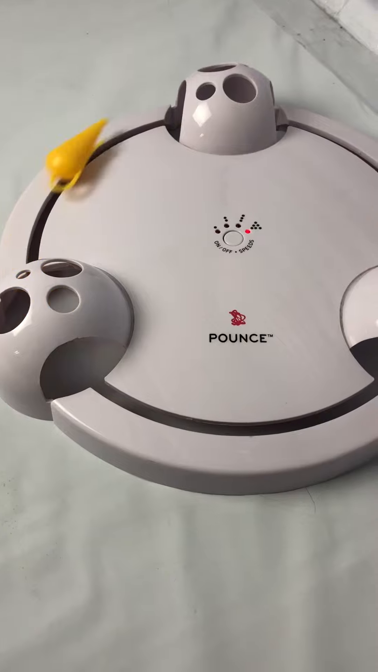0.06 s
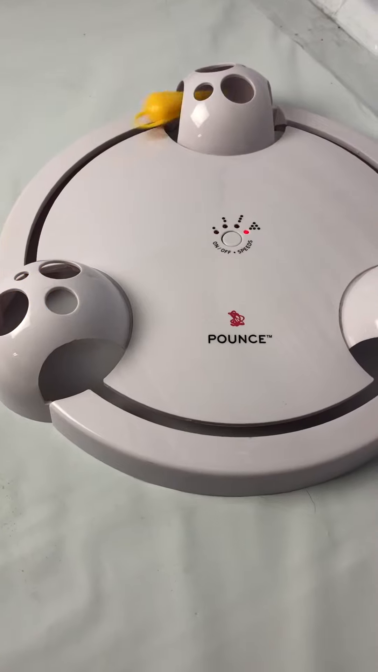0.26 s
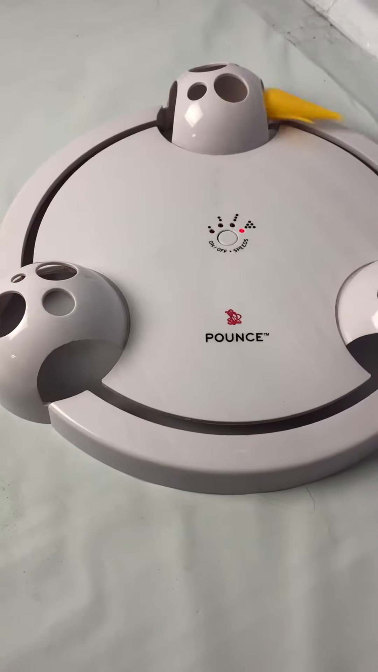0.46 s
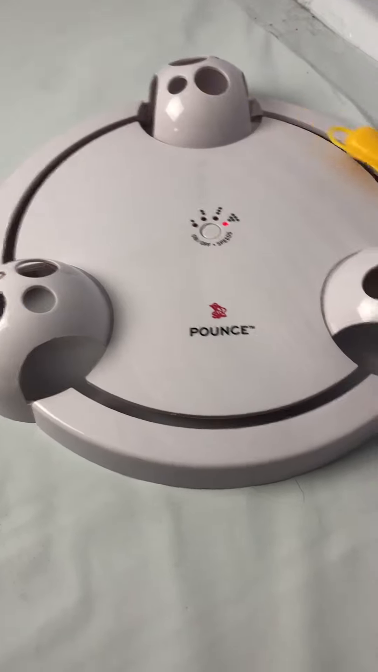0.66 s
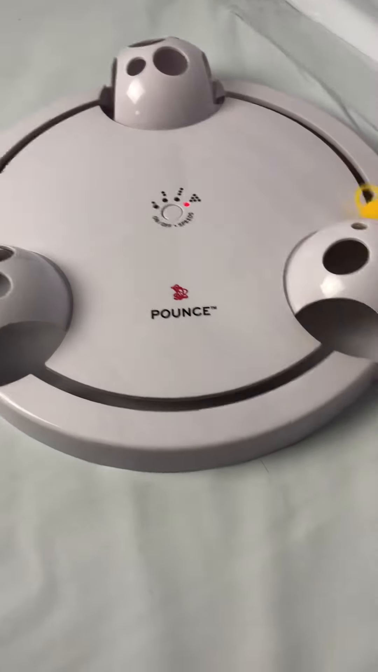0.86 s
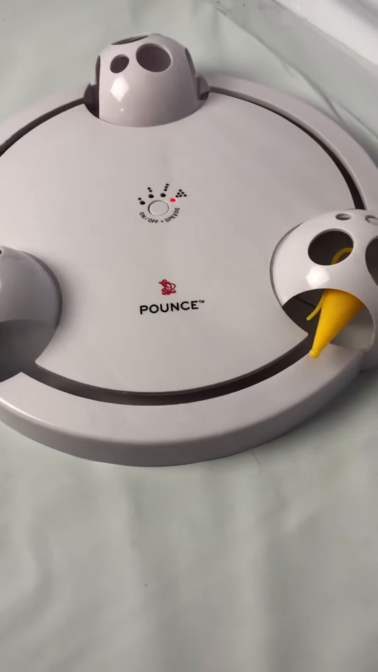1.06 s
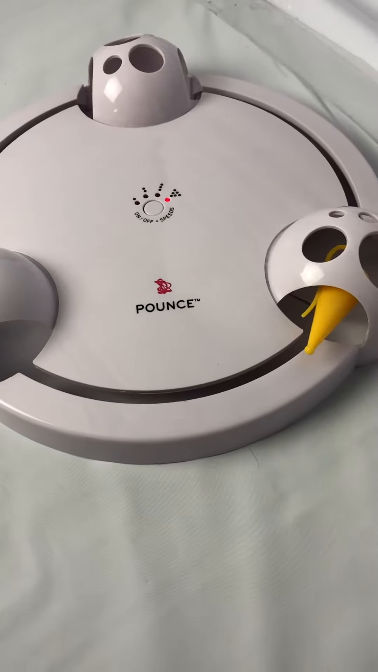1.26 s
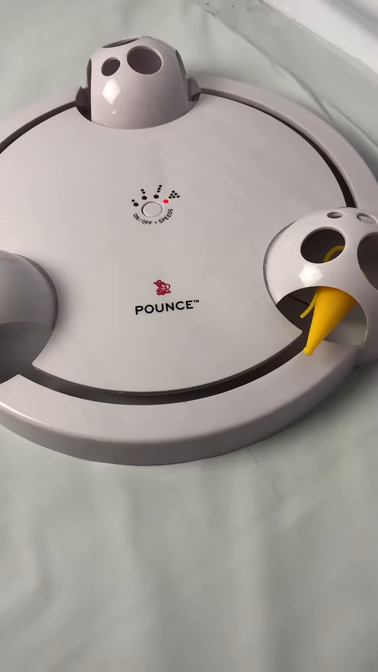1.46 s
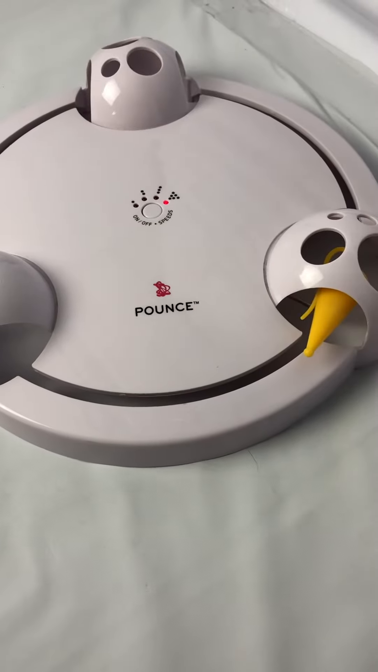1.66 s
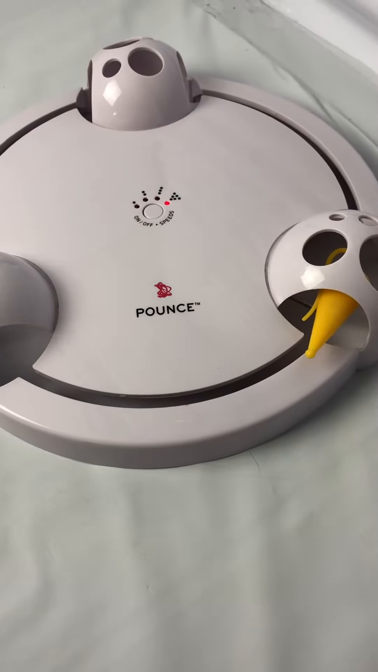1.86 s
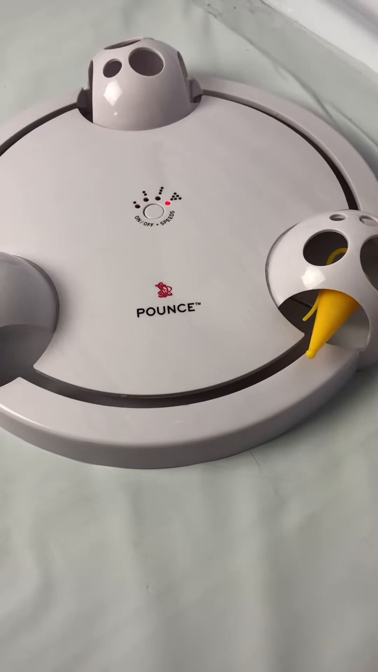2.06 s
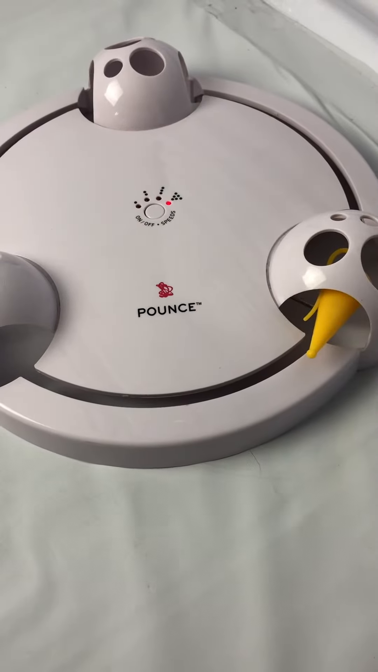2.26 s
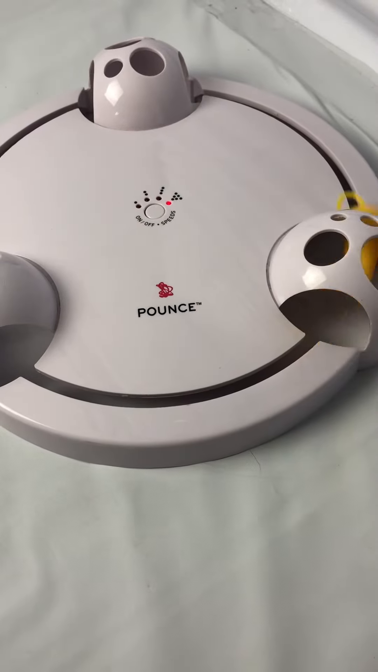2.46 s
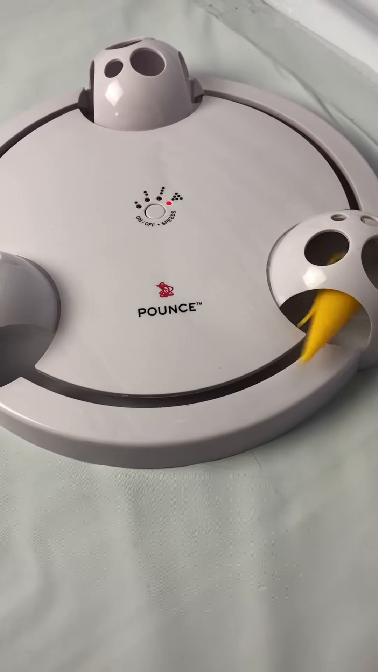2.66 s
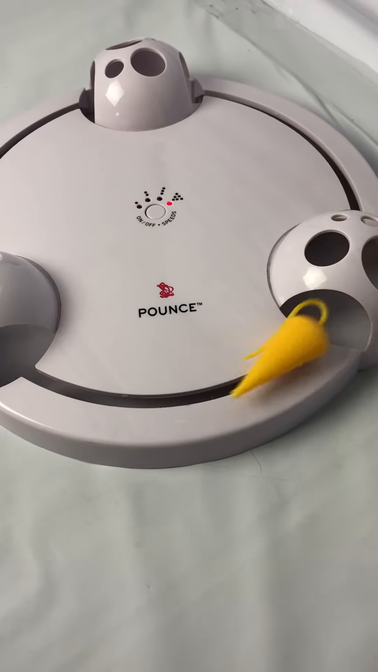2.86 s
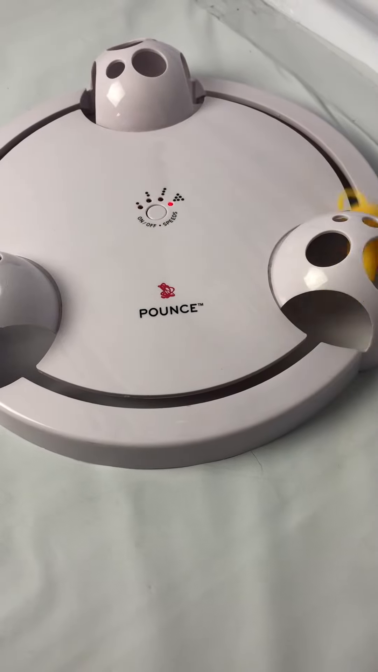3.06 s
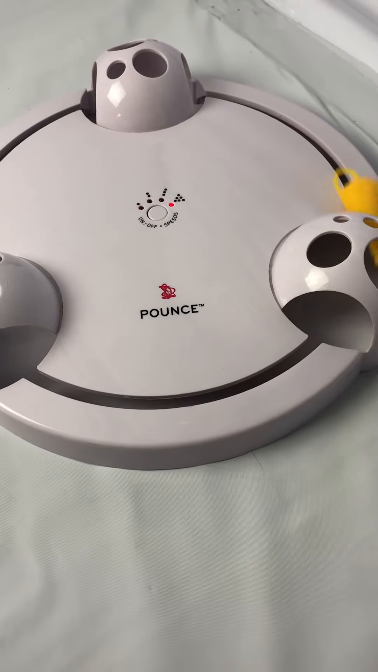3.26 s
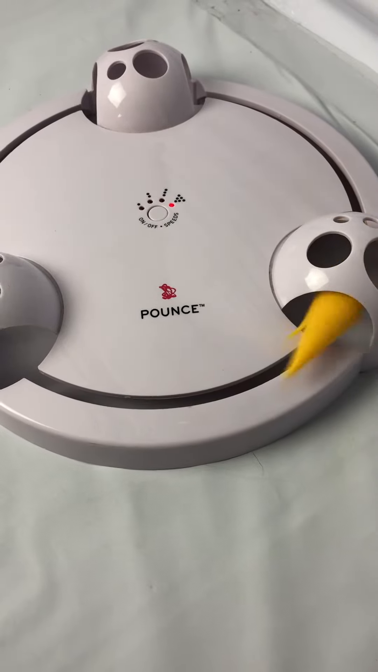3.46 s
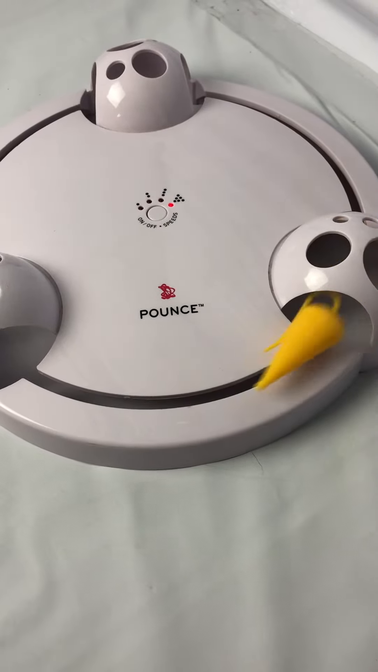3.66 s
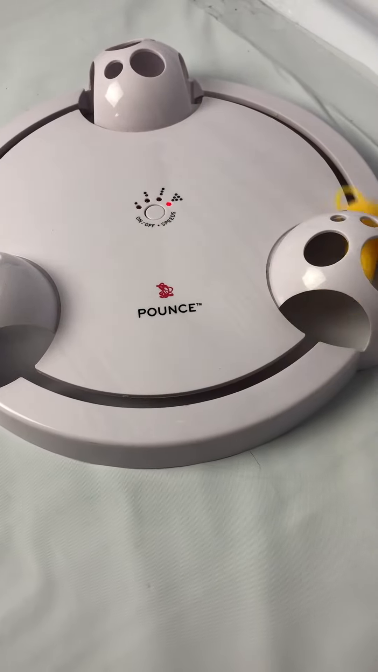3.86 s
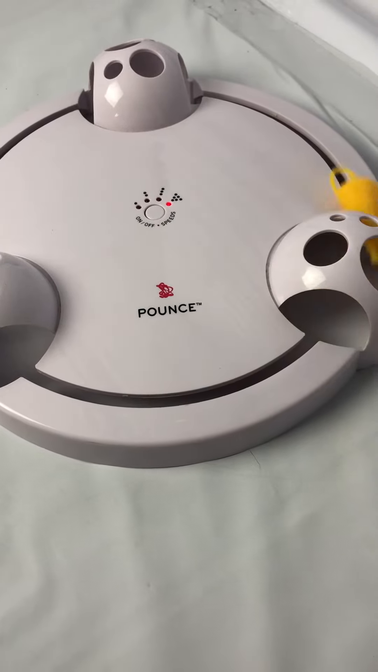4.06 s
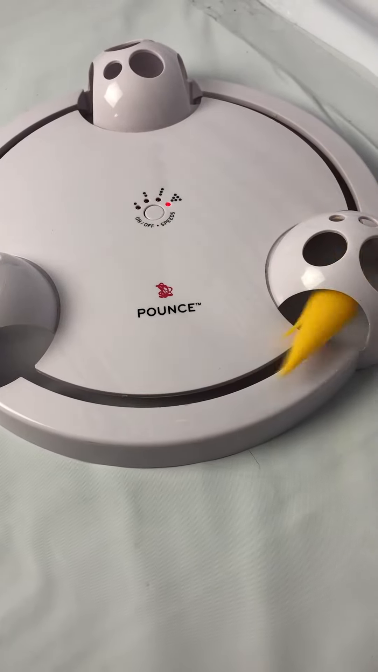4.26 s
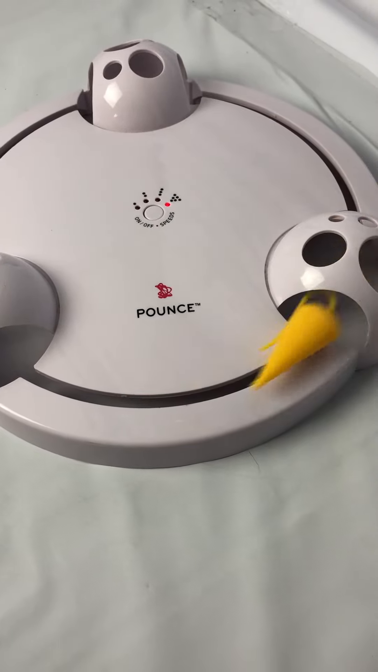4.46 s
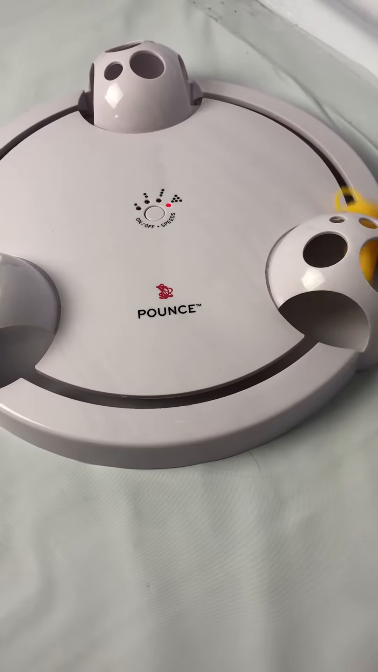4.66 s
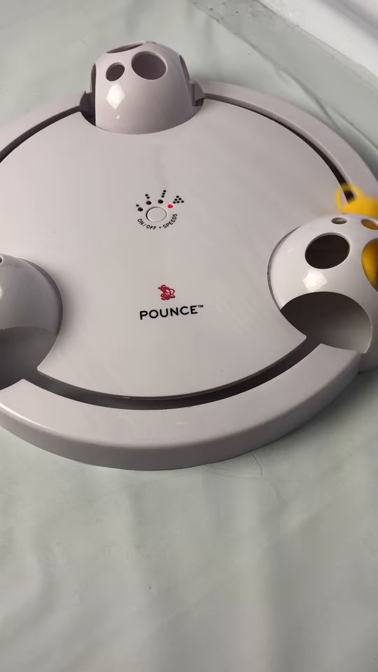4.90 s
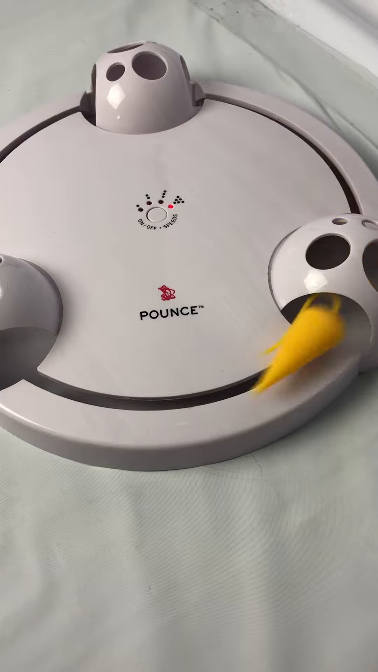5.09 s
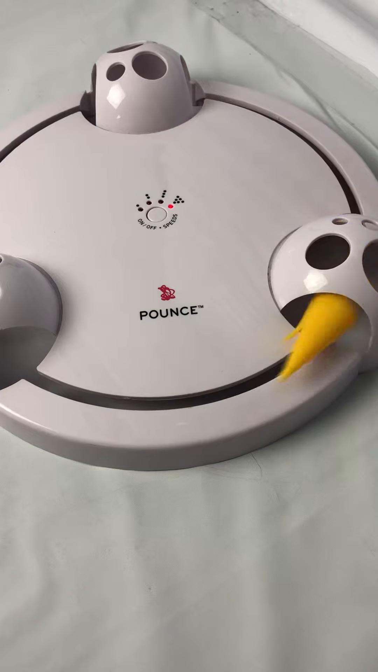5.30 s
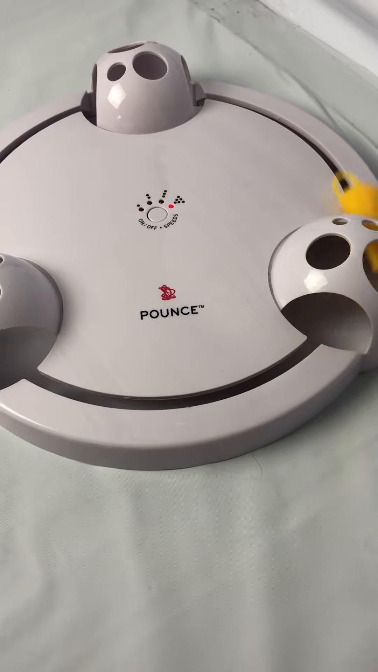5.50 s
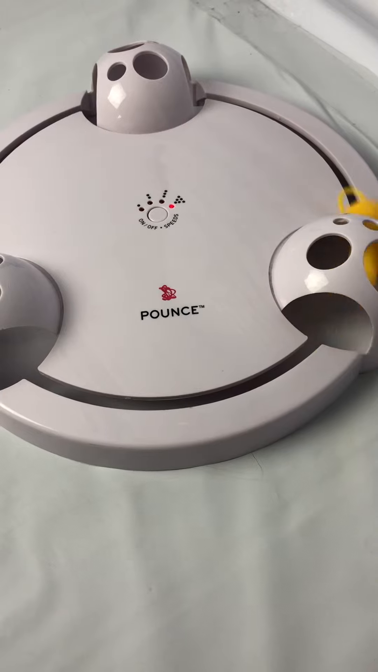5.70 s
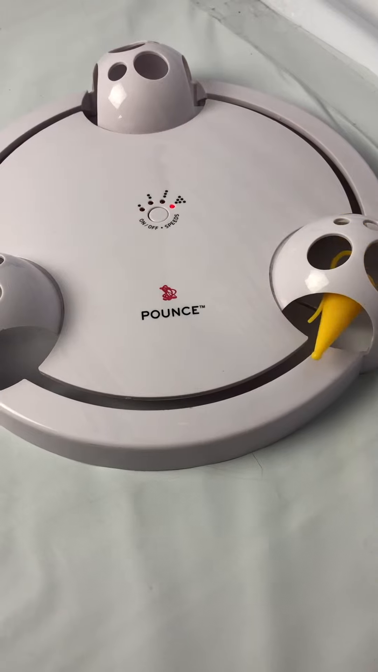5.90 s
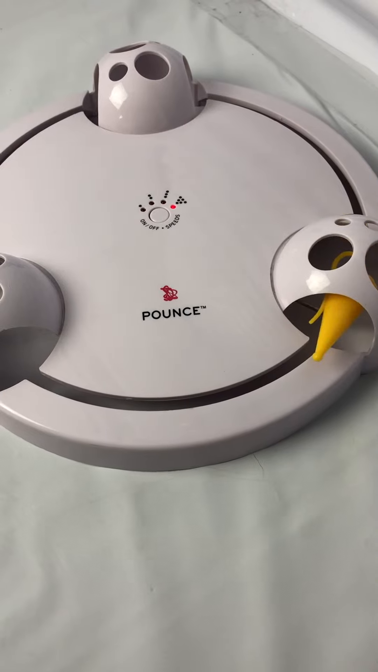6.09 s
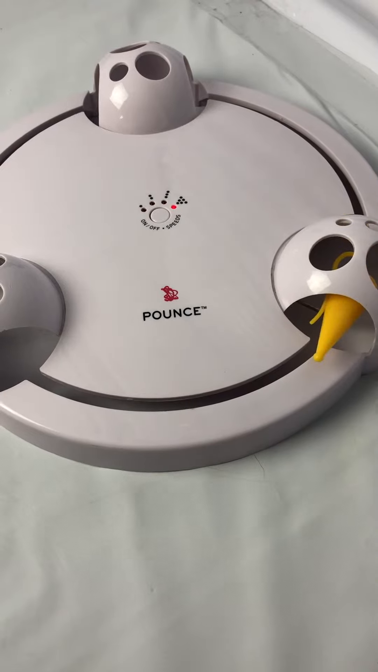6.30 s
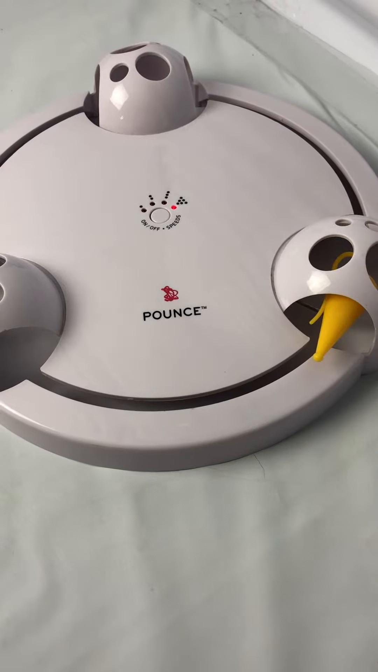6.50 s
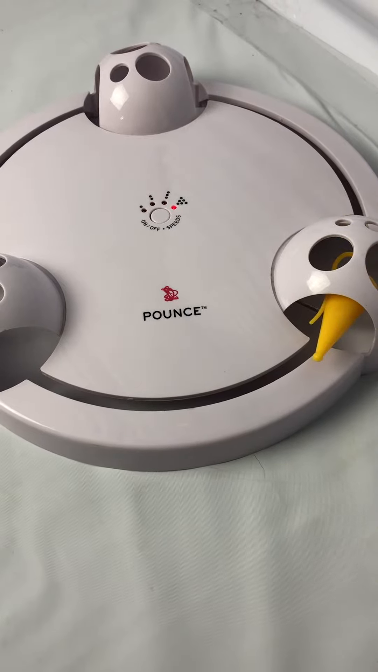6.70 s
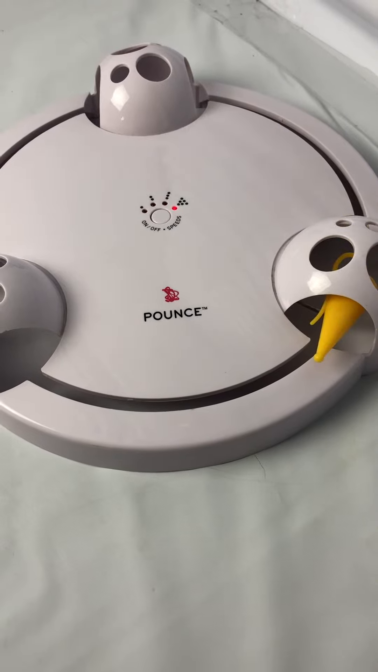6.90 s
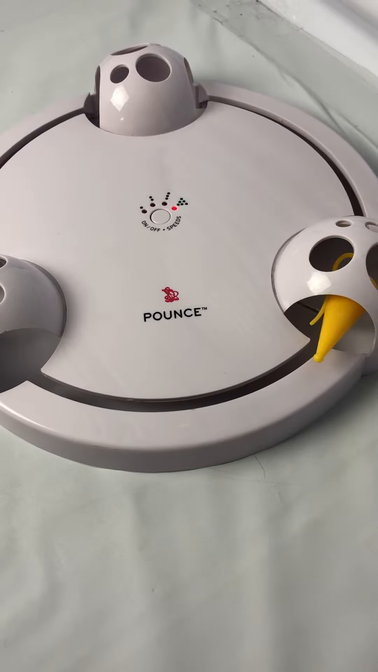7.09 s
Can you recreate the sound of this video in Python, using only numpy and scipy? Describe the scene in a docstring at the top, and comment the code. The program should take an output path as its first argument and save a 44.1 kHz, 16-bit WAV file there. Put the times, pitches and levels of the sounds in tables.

```python
"""A quiet room, with a battery cat toy on a cloth: a small geared motor swings a wand under a plastic shell.
It makes one long sweep, rests, starts with a jolt and jerks to and fro. Gears whirr, loose wheels rattle,
brushes hiss, and the wand knocks and drags in its slot. At each reversal a small part ticks and the slack
in the gear train slams shut, shaking the shell. A soft rumble and mains hum lie underneath."""
import sys
import numpy as np
from scipy import signal
from scipy.fft import rfft, irfft
from scipy.io import wavfile
from scipy.ndimage import uniform_filter1d

SR = 44100
rng = np.random.default_rng(int(sys.argv[2]) if len(sys.argv) > 2 else 0)


def materialize(psi):
    """Save the field psi as 16-bit PCM at rate SR to the path in sys.argv[1].

    A 1-D psi becomes a single channel; in a 2-D psi each row is a channel.
    """
    bounded = np.clip(np.atleast_2d(psi).T, -1, 1)
    quanta = np.round(bounded * 32767).astype(np.int16)
    wavfile.write(sys.argv[1], SR, quanta)


N = 314918
TIME = np.arange(N) / SR

# When the motor has power. Each row: on in seconds, off in seconds.
MOTOR_RUNS = [(-0.2, 1.1), (2.368, 5.945)]
# The motor turns round, out and back in turn. Each row: slam time in seconds, body in dB, crack in dB,
# bounce in dB against the slam, rebound delay in seconds, rebound in dB against the slam, tick in dB.
REVERSALS = [(1.065, -33, -38, -3, .022, -2, -42), (2.491, -32.5, -40.5, -6.5, .024, -2, -58),
             (2.71, -28, -35.5, -4.5, .027, -3.5, -45.5), (3.096, -30.5, -40.5, -5.5, .025, -7, -53),
             (3.49, -31.5, -38.5, -12, .03, 2.5, -42), (3.889, -30.5, -35.5, -6.5, .022, -5.5, -51),
             (4.29, -33, -39, -6, .028, 2, -44.5), (4.691, -30, -38, -7, .022, -6, -53.5),
             (5.088, -29, -37.5, -7, .024, -8.5, -46), (5.488, -30, -38, -6.5, .023, -4.5, -54),
             (5.884, -34.5, -40, .5, .023, 0.3, -42.5)]
# Load on the gears through each move. Each row: seconds into the move, whirr in dB, rattle in dB.
SWEEP_LOAD = [(0, -45.5, -53), (.2, -46.5, -60.5), (.38, -44, -51), (.5, -40.5, -46), (.6, -46.5, -58),
              (.8, -45.5, -58), (.98, -47, -60), (1.06, -42.5, -48.5)]  # heaviest as the wand scrapes through a hood
SWING_OUT_LOAD = [(0, -40.5, -46), (.04, -44, -50), (.1, -47.5, -56), (.155, -41, -50), (.22, -53, -57.5),
                  (.29, -49.5, -54.5), (.34, -51, -54.5), (.39, -47.5, -48)]
SWING_BACK_LOAD = [(0, -48, -44), (.05, -48.5, -50.5), (.11, -48.5, -52.5), (.16, -49, -53), (.2, -45, -52),
                   (.25, -46.5, -51.5), (.33, -47, -55), (.39, -47, -48.5)]

# The wand hits its slot and the hoods. Each row: start in seconds, body in dB, crack in dB.
WAND_KNOCKS = [(0.014, -41.5, -56.5), (0.277, -40, -54), (0.366, -38.5, -53), (0.415, -56, -47.5),
               (0.432, -48, -52), (0.466, -33, -51), (0.477, -50, -40.5), (0.49, -37, -46),
               (0.523, -39.5, -43.5), (2.595, -48, -45), (2.837, -36, -41), (2.853, -44.5, -44.5),
               (3.23, -42.5, -51), (3.302, -44.5, -47), (3.508, -35.5, -39.5), (3.636, -37, -38),
               (3.964, -41, -49.5), (4.008, -40, -52.5), (4.067, -41.5, -47), (4.309, -34, -39.5),
               (4.432, -39.5, -40.5), (4.477, -45, -66), (4.504, -40.5, -52.5), (4.867, -41, -42.5),
               (5.129, -44, -43.5), (5.234, -39.5, -41), (5.628, -41, -49.5), (5.663, -41, -47),
               (5.688, -44, -54), (5.766, -43.5, -56.5), (5.954, -45, -52)]
# The gears rock back softly once the motor stops. Each row: start in seconds, body in dB.
GEAR_BUMPS = [(1.135, -46), (1.188, -56.5), (6.008, -58.5), (6.049, -64.5)]
# The motor kicks the base as it restarts. Each row: start in seconds, level in dB.
MOTOR_JOLT = [(2.386, -46)]

# Resonances of the toy's parts. Each row: centre in Hz, width in Hz, boost or cut in dB.
SHELL_MODES = [(156, 31, 8.5), (228.6, 34, 5.5), (290.1, 47, 9.5), (526.7, 56, 7.5), (639, 37, 4),
               (700.3, 22, 10.5), (893, 13, 4), (959, 34, 6.5), (1023, 102, 9.5), (1203, 86, 4),
               (1477, 15, 5.5), (1514, 51, 5), (1689, 128, 5), (2258, 180, 7.5), (2828, 210, 6.5),
               (3203, 59, 8), (3530, 70, 2), (4005, 49, -14.5), (4014, 150, 10), (4820, 240, 5.5),
               (5300, 110, 5.5), (5960, 140, 4.5)]
MOTOR_CAN_MODES = [(6380, 170, 11), (6740, 120, 11), (6840, 150, 1.5), (7500, 120, 6), (8290, 210, 3.5),
                   (10350, 251, 10.5), (11500, 185, 6), (12500, 380, 7)]
TICK_MODES = [(3240, 207, -4.5), (3444, 194, -1.5), (3900, 280, -4), (4650, 250, -7), (5130, 200, -7),
              (5730, 330, -13), (7400, 900, -20), (8580, 400, -20), (12000, 9200, -30)]
JOLT_MODES = [(640, 75, -4), (665, 110, -6), (1010, 210, -9)]

# The broad tone colour of each layer. Each row: frequency in Hz, relative level in dB.
WHIRR_COLOUR = [(25, -34.5), (60, -4.5), (130, -8), (280, -13.5), (420, -18), (560, -9.5), (680, 0),
                (1000, -4), (1550, -6), (2000, -16.5), (3000, -28), (5000, -52), (9000, -41.5),
                (16000, -53)]
RATTLE_COLOUR = [(100, -8), (450, 0.5), (700, 0), (1100, 5.5), (1600, 12), (2300, -1), (3500, 4),
                 (5200, -5.5), (7500, -18), (10000, -30), (16000, -26)]
BRUSH_COLOUR = [(1000, -29), (2500, 2), (4000, -7), (5600, 1.5), (7000, -2.5), (8300, -1), (9200, -14.5),
                (12000, -13), (16000, -17)]
AMBIENCE_COLOUR = [(15, -65), (25, -35), (48, -6.5), (91, -15), (101, -7.5), (122, 0.5), (148, -15),
                   (183, -9), (582, -19.5), (648, -21), (1530, -27), (1850, -28.5), (3000, -31.5),
                   (8580, -35), (15500, -40)]
BODY_COLOUR = [(30, -41.5), (130, -8), (300, -20), (420, -22.5), (680, -3.5), (1000, -4.5), (1300, 1),
               (1700, -6), (2200, -15), (3500, -18), (16000, -62)]
CRACK_COLOUR = [(500, -42), (1500, -1.5), (2400, -5.5), (3500, -1.5), (5200, -0.5), (7500, -3),
                (9000, -9.5), (11000, -15), (16000, -19.5)]
BOOM_COLOUR = [(25, -27.5), (55, 0.5), (100, -9.5), (150, -3.5), (280, -7), (400, -19), (800, -32),
               (4000, -90)]
DRAG_COLOUR = [(300, -15.5), (700, -4), (1000, -3.5), (1300, -4), (1600, 1.5), (2050, -3.5), (2500, -18.5),
               (4000, -19.5), (9000, -29), (16000, -46)]

# The room's short tail. Each row: frequency in Hz, seconds to fall by 60 dB.
ROOM_T60 = [(100, 0.7), (300, 0.34), (800, 0.19), (2000, 0.17), (6000, 0.15), (15000, 0.13)]


def from_db(db):
    """Decibels as a gain."""
    return 10 ** (np.asarray(db) / 20)


def rms_one(x):
    """Bring a signal to an rms of 1."""
    return x / np.sqrt(np.mean(x ** 2) + 1e-20)


def at_hz(points, hz):
    """Read a table on a log-frequency axis."""
    f, value = np.transpose(points)
    return np.interp(np.log(hz + 0.00094), np.log(f), value)


def response(colour, modes, size):
    """Minimum-phase response of a broad colour with resonances, so nothing rings ahead of a hit."""
    hz = np.arange(size // 2 + 1) * SR / size
    db = at_hz(colour, hz)
    for centre, width, lift in modes:
        db = db + lift / (1 + (2 * (hz - centre) / width) ** 2)
    cepstrum = irfft(np.log(from_db(db)), size)
    cepstrum[1:size // 2] *= 2
    cepstrum[size // 2 + 1:] = 0
    return np.exp(rfft(cepstrum))


def coloured(x, colour, modes=(), size=16384):
    """Play x through a colour and its resonances; it comes out at rms 1."""
    return rms_one(signal.oaconvolve(x, irfft(response(colour, modes, size)))[:N])


def resonate(x, hz, width):
    """Two-pole resonance with a gain of 1 at its peak."""
    r = np.exp(-np.pi * width / SR)
    feedback = [1, -2 * r * np.cos(2 * np.pi * hz / SR), r * r]
    return signal.lfilter(np.array([1, 0, -1]) * (1 - r * r) / 2, feedback, x)


def motor_speed(spin_up_s=0.073, coast_s=0.017):
    """From 0 to 1: the motor spins up under power and coasts to rest when cut."""
    return sum((1 - np.exp(-np.maximum(TIME - on, 0) / spin_up_s))
               * np.exp(-np.maximum(TIME - off, 0) / coast_s) for on, off in MOTOR_RUNS)


def gear_load():
    """Gains of whirr and rattle: the long sweep, then a fresh swing from each reversal."""
    db = np.zeros((2, N))
    swings = [(row[0], SWING_BACK_LOAD if k % 2 else SWING_OUT_LOAD) for k, row in enumerate(REVERSALS)]
    for start, course in [(0, SWEEP_LOAD)] + swings:
        s, *columns = np.transpose(course)
        after = TIME >= start
        db[:, after] = [np.interp(TIME[after] - start, s, column) for column in columns]
    return from_db(db) * motor_speed()


def contacts(rate_hz, jitter, uneven_db):
    """A train of clicks, loose in timing, each with its own force."""
    spacing, force = rng.standard_normal((int(8 * rate_hz), 2)).T
    at = (np.cumsum(1 + jitter * spacing) * SR / rate_hz).astype(int)
    inside = (at >= 0) & (at < N)
    clicks = np.zeros(N)
    clicks[at[inside]] = from_db(uneven_db * np.clip(force[inside], -2, 2))
    return rms_one(clicks - clicks.mean())


def gears(drive):
    """The teeth of a slow and a fast stage tap through the shell, over the rub of their flanks."""
    slow = from_db(-6.0) * contacts(rate_hz=146, jitter=.05, uneven_db=2.0)
    fast = from_db(-6.5) * contacts(rate_hz=340, jitter=.12, uneven_db=4.0)
    rub = from_db(3) * rng.standard_normal(N)
    return drive * coloured(slow + fast + rub, WHIRR_COLOUR, SHELL_MODES)


def rattle(drive, decay_s=0.0052):
    """Loose wheels flop over, each time with a short gritty scrape."""
    flops = contacts(rate_hz=40, jitter=0.33, uneven_db=2.5)
    scrapes = signal.lfilter([1], [1, -np.exp(-1 / (decay_s * SR))], flops - flops.min())
    grit = (rms_one(scrapes) + 0.82) * rng.standard_normal(N)
    return drive * coloured(grit, RATTLE_COLOUR, SHELL_MODES)


def brushes(level_db=-63.5, dip_db=-0.5, lead_s=0.12, width_s=0.052):
    """The brushes scrape and ring the motor can, easing a touch as it slows for each reversal."""
    stall = sum(np.exp(-((TIME - s + lead_s) / width_s) ** 2) for s, *_ in REVERSALS)
    hiss = coloured(rng.standard_normal(N), BRUSH_COLOUR, MOTOR_CAN_MODES)
    return from_db(level_db + dip_db * stall) * motor_speed() * hiss


def ambience(hum_hz=110):
    """The room's bed: mains hum, a faint high tone, soft rumble and hiss."""
    hum = from_db(-76.5) * rms_one(np.sin(2 * np.pi * hum_hz * TIME))
    tone = from_db(-89) * rms_one(resonate(rng.standard_normal(N), hz=8620, width=170))
    rumble = from_db(-68) * coloured(rng.standard_normal(N), AMBIENCE_COLOUR)
    return hum + tone + rumble


def chatter(count, decay_s, grit_db, rise_s, size=8192):
    """One fast-dying burst of tiny uneven contacts per blow; rise and decay may differ by blow."""
    t = np.arange(size) / SR
    draws = rng.standard_normal((count, 2, size))
    grit = draws[:, 0] * from_db(grit_db * np.clip(draws[:, 1], -2, 2))
    return grit * np.exp(-t / decay_s) * (1 - np.exp(-t / rise_s))


def place(times, dbs, bursts):
    """Lay bursts on the timeline, each levelled by its first 8 ms."""
    track = np.zeros(N + bursts.shape[1])
    head = int(.008 * SR)
    for s, db, burst in zip(times, dbs, bursts):
        at = max(int(s * SR), 0)
        track[at:at + len(burst)] += from_db(db) * burst / np.sqrt(np.mean(burst[:head] ** 2))
    return track[:N]


def knocks(blows, firm_db=-35.5, span_db=4.5, size=8192):
    """Each blow is a hard crack, a clack of the shell's body and a slower boom of the hollow base."""
    s, body_db, crack_db = np.transpose(blows)
    # 0 is a firm, abrupt slap; 1 is a graze that builds more slowly and scrapes on for longer
    graze = np.clip((firm_db - crack_db) / span_db, 0, 1)[:, None]
    body = chatter(len(s), decay_s=0.0045 + 0.0039 * graze, grit_db=2.5, rise_s=0.001 + 0.0015 * graze)
    crack = chatter(len(s), decay_s=0.0051 + 0.0022 * graze, grit_db=5, rise_s=0.0005 + 0.00065 * graze)
    body = irfft(rfft(body) * response(BODY_COLOUR, SHELL_MODES, size))
    crack = irfft(rfft(crack) * response(CRACK_COLOUR, SHELL_MODES, size))
    bloom = np.exp(-TIME[:size] / 0.032) * (1 - np.exp(-TIME[:size] / 0.0062))
    swell = place(s, body_db, np.tile(bloom, (len(s), 1)))
    boom = from_db(-28.5) * swell * coloured(rng.standard_normal(N), BOOM_COLOUR, SHELL_MODES)
    return place(s, body_db, body) + place(s, crack_db, crack) + boom


def knocks_and_bumps(bump_crack_db=-74):
    """Cues for the wand's knocks, then the soft bumps of the gears rocking back, with hardly any crack."""
    return list(WAND_KNOCKS) + [(s, body_db, bump_crack_db) for s, body_db in GEAR_BUMPS]


def ringing(blows, modes, decay_s):
    """Short touches ring a few modes; each resonance acts twice, so little lies between them."""
    s, db = np.transpose(blows)
    touch = chatter(len(s), decay_s=decay_s, grit_db=1.5, rise_s=0.00018)
    ring = sum(from_db(gain) * resonate(resonate(touch, hz, width), hz, width)
               for hz, width, gain in modes)
    return place(s, db, ring)


def ticks(lead_s=.0495):
    """A small stiff part snaps over and rings high ahead of each reversal, firmer before a swing out."""
    return ringing([(s - lead_s, tick_db) for s, *_, tick_db in REVERSALS], TICK_MODES, decay_s=0.0071)


def swing_starts():
    """Start times of the swings out and of the swings back."""
    s = np.array(REVERSALS)[:, 0]
    return s[0::2], s[1::2]


def gear_slams(take_up_s=.034, bounce_s=.0085, settle_s=.024, rebound_crack_db=1.5, loss_db=0.5):
    """Cues for the slack slamming shut: a hit, a quick bounce, a brighter rebound and settling taps."""
    _, backs = swing_starts()
    blows = [(s - take_up_s, -42.5, -52) for s in backs]  # a light knock takes up the slack first
    for s, body, crack, bounce, delay, rebound, _ in REVERSALS:
        blows += [(s, body, crack),
                  (s + bounce_s, body + bounce, crack + bounce),
                  (s + delay, body + rebound, crack + rebound + rebound_crack_db)]
        taps = s + delay + np.cumsum(settle_s * rng.uniform(.8, 1.2, 2))
        blows += [(tap, -43.5 - k * loss_db, -53.5 - k * loss_db)
                  for k, tap in enumerate(taps) if any(on < tap < off for on, off in MOTOR_RUNS)]
    return blows


def jolt():
    """The restarting motor gives the base a dull kick."""
    return ringing(MOTOR_JOLT, JOLT_MODES, decay_s=0.0013)


def drags(delay_s=0.1108, length_s=0.0303, edge_s=0.0031, out_db=-41, back_db=-41.5):
    """Gathering speed after a reversal, the wand rubs its slot: a hollow run of plastic slips."""
    pressure = sum(from_db(db) * np.clip(np.minimum(TIME - s, s + length_s - TIME) / edge_s, 0, 1)
                   for starts, db in zip(swing_starts(), (out_db, back_db)) for s in starts + delay_s)
    slips = contacts(rate_hz=420, jitter=.25, uneven_db=3.0) + rng.standard_normal(N)
    return motor_speed() * pressure * coloured(slips, DRAG_COLOUR, SHELL_MODES)


def room(x, wet_db, onset_s=0.0034, size=22050):
    """Diffuse reflections, dying sooner in the treble; the soft furnishings favour no pitch."""
    t, tail = TIME[:size], 0
    edges = np.geomspace(40, 18000, 10)
    for low, high in zip(edges, edges[1:]):
        bandpass = signal.butter(2, [low, high], "band", fs=SR, output="sos")
        band = signal.sosfilt(bandpass, rng.standard_normal(size))
        tail = tail + band * from_db(-60 * t / at_hz(ROOM_T60, np.sqrt(low * high)))
    tail = tail * (1 - np.exp(-(t / onset_s) ** 2))
    direct = t == 0
    path = rfft(direct + from_db(wet_db) * tail / np.sqrt(np.sum(tail ** 2)))
    # even out the peaks and dips so the room stays neutral
    power = uniform_filter1d(np.abs(path) ** 2, size=15)
    hz = np.arange(len(power)) * SR / size
    flattening = np.column_stack([hz, 10 * np.log10(power.mean() / power)])[1:]
    return signal.oaconvolve(x, irfft(path * response(flattening, (), size)))[:N]


def scene():
    """The toy's running noise and its hits share one room, over the quiet bed; mono."""
    whirr_gain, rattle_gain = gear_load()
    motor = gears(whirr_gain) + rattle(rattle_gain) + brushes()
    toy = motor + knocks(gear_slams() + knocks_and_bumps()) + drags() + ticks() + jolt()
    return (room(toy, wet_db=-10.5) + ambience())[None]


def record(dry, cutoff_hz=15950):
    """A steep low-pass takes off the very top."""
    return signal.sosfilt(signal.ellip(12, .1, 70, cutoff_hz, fs=SR, output="sos"), dry)


dry = scene()
out = record(dry)
materialize(out)
```